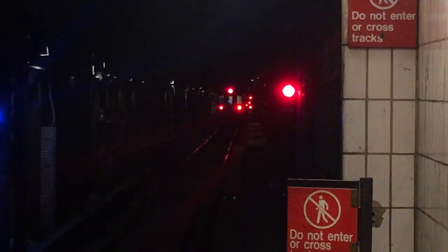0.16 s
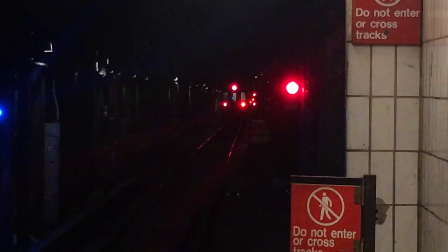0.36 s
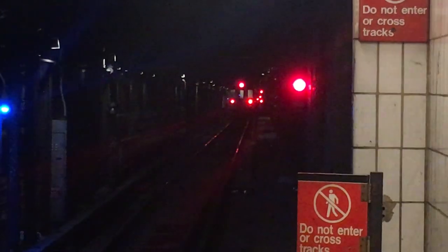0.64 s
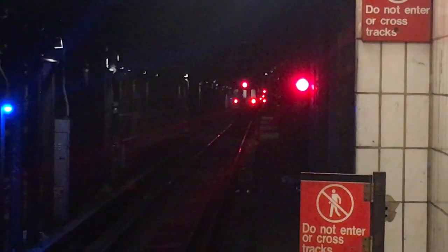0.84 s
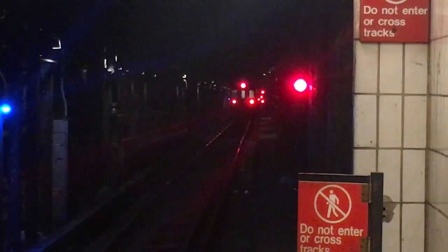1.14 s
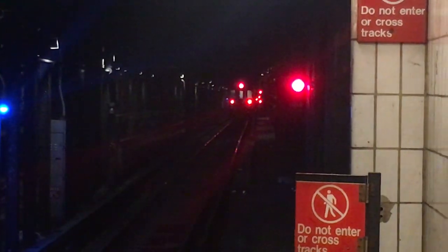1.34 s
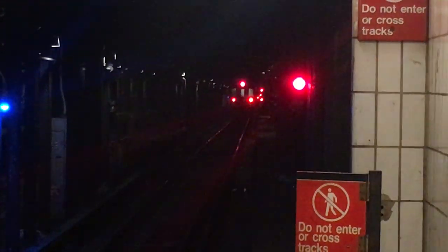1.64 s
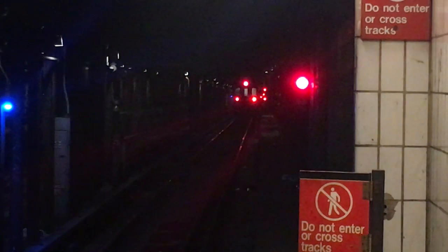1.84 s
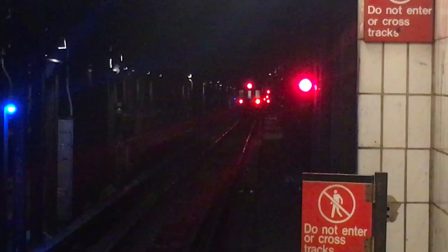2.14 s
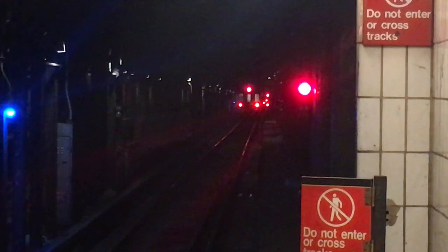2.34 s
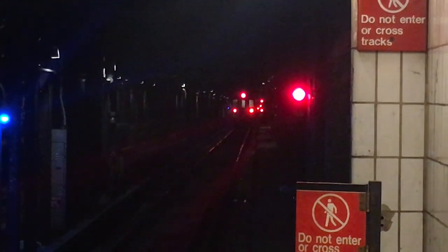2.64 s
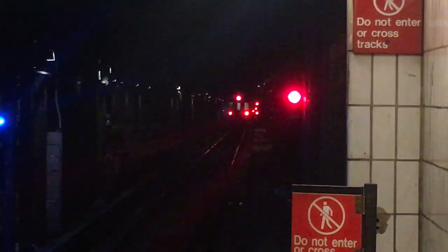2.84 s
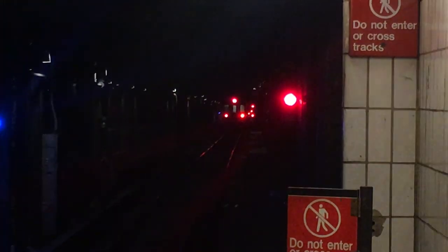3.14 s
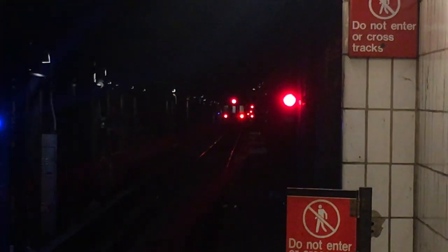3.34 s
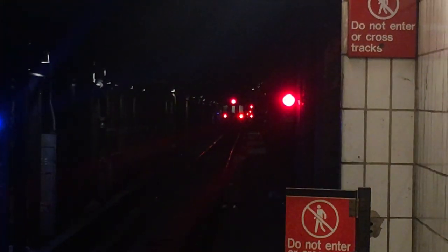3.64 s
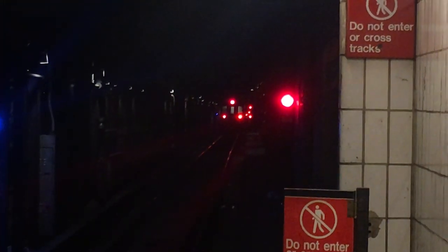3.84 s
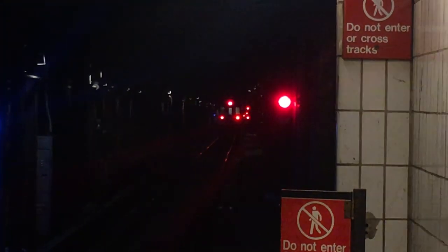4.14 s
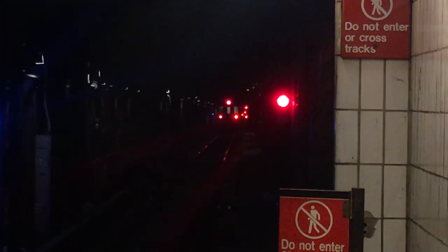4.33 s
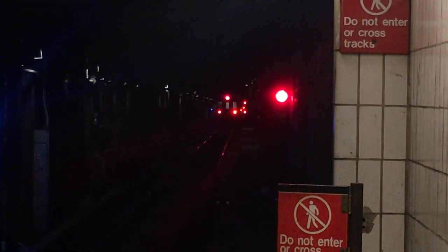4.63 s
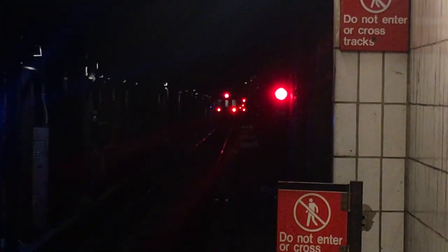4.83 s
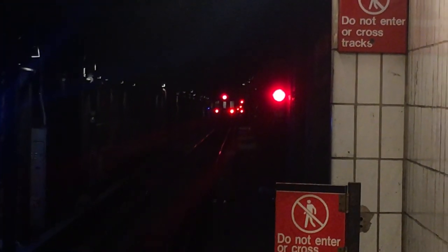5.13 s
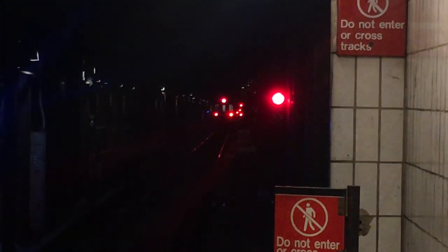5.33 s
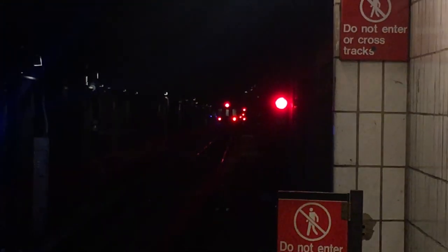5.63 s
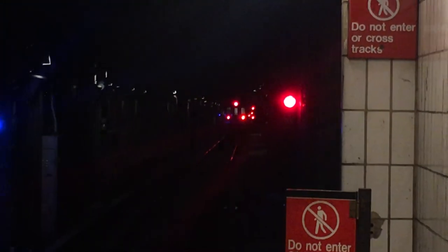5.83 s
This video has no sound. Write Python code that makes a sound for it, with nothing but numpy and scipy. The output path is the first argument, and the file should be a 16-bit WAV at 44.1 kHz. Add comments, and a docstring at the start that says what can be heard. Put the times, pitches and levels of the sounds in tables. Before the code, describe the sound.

For about six seconds, a train rolls away down an underground tunnel, heard from the platform end. A deep, booming rumble dominates throughout, mostly between about 50 and 210 hertz, with irregular short swells and lulls. From roughly 0.6 to 1.45 seconds the boom throbs evenly, about seven beats per second. Far quieter are a dull mid-range wheel roar and a thin rail whirr, which gradually loses brightness. Faint, fuzzy metallic squeaks dot the sound: a lower one near 0.55 seconds, many high chirps until 2.4, and the sharpest, a brief click-like squeak, at about 2.05. They become sparse from 2.6 to 4.9, then a soft high cluster comes around 5.0 to 5.4. Tunnel echo blurs them, and wheel rims murmur faintly. The deep rumble remains, slightly stronger in its lowest part at the end, without fully fading. Single channel, distant microphone, very faint steady hiss.

```python
"""End of an underground platform: a train rolls away down the tunnel.
Noise rings a few low tunnel resonances (the boom); shaped noise makes wheel roar and rail whirr.
Wheel rims squeak now and then, a fuzzy tone in rough noise bands with a tunnel echo.
Rim modes murmur as narrow-band noise; a faint hiss lies under it all."""
import sys
import numpy as np
from scipy import signal
from scipy.io import wavfile
from scipy.ndimage import uniform_filter1d

SR = 44100
rng = np.random.default_rng(int(sys.argv[2]) if len(sys.argv) > 2 else 0)


def generate_wav(sig):
    """Save sig (samples, or channels by samples) to the path in sys.argv[1] as 16-bit PCM at SR."""
    pcm = np.round(np.clip(np.atleast_2d(sig).T, -1, 1) * 32767).astype(np.int16)
    wavfile.write(sys.argv[1], SR, pcm)


N = 263704


def gain_of(db):
    """Amplitude factor of a level in dB."""
    return 10 ** (np.asarray(db) / 20)


def evened(x):
    """Scales to RMS 1."""
    return x / np.sqrt(np.mean(x ** 2) + 1e-20)


def smoothed_twice(x, size):
    """Two running means along the last axis."""
    return uniform_filter1d(uniform_filter1d(x, size=size), size=size)


def add(mix, start_s, sound):
    """Adds a sound in place, cut at the end of the mix."""
    part = mix[round(start_s * SR):][:len(sound)]
    part += sound[:len(part)]


def resonate(x, f_hz, pole_width_hz):
    """Shifts f_hz to zero, smooths with two equal poles, shifts back: steep resonance of peak gain 1."""
    turn = np.exp(2j * np.pi * np.cumsum(f_hz * np.ones(len(x))) / SR)
    r = np.exp(-np.pi * pole_width_hz / SR)
    once = signal.lfilter([1 - r], [1, -r], x / turn)
    twice = signal.lfilter([1 - r], [1, -r], once)
    return 2 * (turn * twice).real


def level(column, swell_db=0.):
    """Gain over time from one column of the slow levels, plus any swells."""
    # slow levels: t/s, deep rumble/dB, boom/dB, upper rumble/dB, wheel roar/dB, rail whirr/dB
    train_levels = [(0., -35., -29.5, -36, -51., -55), (1.4, -36., -28, -34.5, -52, -56.5),
                    (2.2, -37., -30., -35., -51.5, -55.5), (3.5, -34.5, -29, -36.5, -52.5, -58.),
                    (4.4, -34.5, -30.5, -36., -51.5, -58.5), (5.1, -33.5, -30.5, -37., -52, -57),
                    (5.98, -32, -31.5, -35, -52.8, -59.)]
    columns = np.transpose(train_levels)
    slow_db = np.interp(np.arange(N) / SR, columns[0], columns[column])
    return gain_of(slow_db + swell_db)


def wash(spectrum, patchy_db, flicker_db):
    """Random short-time spectra with drifting patches and a flicker shared by all pitches."""
    frame, hop = 512, 128  # samples
    frames, bins_hz = N // hop + 5, np.fft.rfftfreq(frame, 1 / SR)
    real, imag, patches = rng.standard_normal((frames, len(bins_hz), 3)).T
    patches = uniform_filter1d(patches, size=5, axis=0)  # over pitch
    patches = evened(uniform_filter1d(patches, size=30, axis=1))  # over time
    flicker = evened(uniform_filter1d(rng.standard_normal(frames), size=12))
    f_hz, db = np.transpose(spectrum)
    colour_db = np.interp(np.log(bins_hz + 1), np.log(f_hz), db, left=-90, right=-90)
    total_db = colour_db[:, None] + patchy_db * patches + flicker_db * flicker
    z = (real + 1j * imag) * gain_of(total_db)
    return evened(signal.istft(z, nperseg=frame, noverlap=frame - hop)[1][:N])


def rumble(modes):
    """Rolling noise rings low resonances of the tunnel."""
    drive = rng.standard_normal((len(modes), N + SR))
    rung = sum(gain_of(db) * resonate(d, f_hz, pole_width_hz)
               for d, (f_hz, pole_width_hz, db) in zip(drive, modes))
    swings = smoothed_twice(rung ** 2, size=3500)
    rung = rung / swings ** .3  # partly evens out the slow swings of chance
    return evened(rung[SR:])  # resonances build up in the dropped first second


def swells(column):
    """Bell-shaped rises and lulls in dB from one column of the swell table."""
    # swells and lulls: t/s, deep rumble rise/dB, boom rise/dB, upper rumble rise/dB
    rumble_swells = [(.02, 9.5, 5.5, -3), (.17, 0.5, 5., -1.5), (.27, 8, 3, 3.5), (.4, 4.5, 3, 2),
                     (1.04, 8, -2, -2), (1.62, 6, 2.5, -2), (1.93, 12, 0, -1.5), (2.04, 0., -0.5, 4),
                     (2.15, 3, -4., 4.5), (2.36, -5, 4., 1.5), (2.71, 0., 0, 2), (2.89, 4, -6.5, 4.),
                     (3.21, 4, 5, 3), (3.4, 8., -4, 0.5), (4.05, 6.5, -1, 2.5), (4.23, 2, 4.5, -1.5),
                     (4.38, 0.5, 9, 1), (4.82, 6., 0., 0.), (3.71, -1.5, 5.5, 1), (5.02, 5.5, -1.5, -0.5),
                     (5.25, 5., 2.5, -1), (5.62, -1.5, -3, 0.5), (5.83, -1.5, -4.5, -5.5)]
    sigma_s = 0.021
    t = np.arange(N) / SR
    return sum(row[column] * np.exp(-.5 * ((t - row[0]) / sigma_s) ** 2) for row in rumble_swells)


def throb():
    """An even beat in dB that fades in and out over half a beat."""
    # early throb of the boom: first beat/s, last beat/s, rate/Hz, depth either way/dB
    even_beat = (0.611, 1.45, 7.16, 3.8)
    first_s, last_s, rate_hz, depth_db = even_beat
    t = np.arange(N) / SR
    gate = np.clip(np.minimum(t - first_s, last_s - t) * 2 * rate_hz + 1, 0, 1)
    return depth_db * gate * np.cos(2 * np.pi * rate_hz * (t - first_s))


def tunnel_rumble():
    """Three groups of tunnel resonances, each with its own slow level and swells."""
    # tunnel resonances: f/Hz, width of each pole/Hz, level within the group/dB
    deep_modes = [(51.9, 16, -6.5), (67.5, 24.8, -2.5)]
    boom_modes = [(121.05, 34, -0.5), (133.45, 22.6, 1), (156.3, 32, -5.5)]
    upper_modes = [(192.15, 13.4, 5.5), (211.5, 79.7, -1), (318.2, 91, -13.5)]
    deep = level(column=1, swell_db=swells(column=1)) * rumble(deep_modes)
    boom = level(column=2, swell_db=swells(column=2) + throb()) * rumble(boom_modes)
    upper = level(column=3, swell_db=swells(column=3)) * rumble(upper_modes)
    return deep + boom + upper


def wheel_roar():
    """Dull roar of the wheels: mid-band noise, slightly patchy and flickering."""
    # relative noise density: f/Hz, level/dB per Hz
    roar_spectrum = [(250, -7), (420, 6.5), (540, 1), (620, 10), (710, 5.5), (800, 6), (980, 2),
                     (1190, -9.5), (1500, -36)]
    return level(column=4) * wash(roar_spectrum, patchy_db=-0.23, flicker_db=0.72)


def rail_whirr():
    """Brighter rail noise above the roar."""
    # relative noise density: f/Hz, level/dB per Hz
    whirr_spectrum = [(900, -2), (1300, -0.5), (1650, -1), (1950, 0), (2400, -9), (2900, -7.5),
                      (3400, -11.5), (3800, -12.5), (4050, -20.5), (4350, -17.5), (4700, -22),
                      (5200, -21.5), (6500, -38.5), (8000, -55)]
    return level(column=5) * wash(whirr_spectrum, patchy_db=0.4, flicker_db=0.64)


def squeak(nominal_s, f_hz, db):
    """Stick-slip rings one rim mode: a wandering thread of tone in a rough band and a wide scrape."""
    u = np.linspace(0, 1, int(1.2 * nominal_s * SR))
    wander, grit, rasp, slips = rng.standard_normal((4, len(u)))
    waver_hz = 50. + 450. * nominal_s  # longer squeaks waver more widely
    pitch_hz = f_hz + 40. * rng.standard_normal() * (u - .5)  # chance glide up or down
    thread_hz = pitch_hz + .3 * waver_hz * evened(uniform_filter1d(wander, size=500))
    thread = np.sin(2 * np.pi * np.cumsum(thread_hz) / SR)
    band = evened(resonate(grit, pitch_hz, 30 + 1.15 * waver_hz))
    scrape = evened(resonate(rasp, pitch_hz, 900.))
    ring = 1.1 * thread + band + .25 * scrape
    ring = ring * gain_of(1.2 * evened(uniform_filter1d(slips, size=400)))  # grip comes in jerks
    envelope = u ** 0.38 * (1 - u) ** 0.46
    return gain_of(db) * evened(ring * envelope)


def echo(x, t60_s):
    """A dense noise tail off the tunnel walls, energy 1, cut at half a second."""
    t = np.arange(SR // 2) / SR
    tail = rng.standard_normal(len(t)) * gain_of(-60 * t / t60_s)
    return signal.fftconvolve(x, tail / np.linalg.norm(tail))[:N]


def rim_squeaks():
    """Wheel rims sing in short squeaks, with the tunnel echo added."""
    # squeaks: t/s, nominal length/s (sounds 1.2 times as long), f/Hz, RMS level before echo/dB
    squeak_events = [(0.322, 0.042, 4020, -75.5), (0.466, 0.022, 4900, -73), (0.53, 0.16, 1660, -61.5),
                     (0.572, 0.07, 4830, -70.5), (0.547, 0.09, 5050, -76), (0.645, 0.084, 4000, -75.5),
                     (0.78, 0.288, 4820, -77), (0.843, 0.036, 5110, -76), (0.885, 0.084, 2300, -69),
                     (0.995, 0.03, 4040, -69.5), (1.058, 0.051, 4100, -68), (1.059, 0.11, 4750, -79),
                     (1.228, 0.06, 5500, -79), (1.242, 0.05, 3700, -66), (1.312, 0.3, 5330, -78),
                     (1.4, 0.07, 5500, -79.5), (1.329, 0.14, 3464, -64.5), (1.52, 0.09, 4100, -73),
                     (1.724, 0.057, 5340, -75), (1.849, 0.2, 4600, -78.5), (1.749, 0.13, 4110, -76.5),
                     (2.052, 0.035, 1957, -55.5), (2.055, 0.069, 2340, -68.5), (2.097, 0.15, 5070, -78),
                     (2.14, 0.11, 4650, -74.5), (2.144, 0.12, 4020, -66), (2.101, 0.29, 3100, -68),
                     (2.347, 0.07, 4810, -74.5), (2.59, 0.03, 4130, -75), (3.05, 0.24, 3480, -71),
                     (3.404, 0.037, 3450, -69.5), (3.66, 0.12, 3400, -69.5), (3.87, 0.19, 4830, -80.5),
                     (3.88, 0.19, 3430, -75.5), (4.344, 0.026, 4600, -70), (4.348, 0.03, 3280, -69.5),
                     (4.7, 0.062, 4630, -73.5), (4.843, 0.035, 4700, -75), (4.98, 0.082, 4120, -80),
                     (5.05, 0.073, 4810, -71), (5.061, 0.075, 3250, -73), (5.128, 0.17, 4680, -74.5),
                     (5.167, 0.15, 4120, -65.5), (5.193, 0.11, 3950, -69.5), (5.23, 0.15, 4160, -69.5)]
    rims = np.zeros(N)
    for start_s, *settings in squeak_events:
        add(rims, start_s, squeak(*settings))
    return rims + gain_of(-8.5) * echo(rims, t60_s=0.93)


def rim_murmur():
    """Rail roughness keeps a few rim modes ringing, each coming and going."""
    # rim modes: f/Hz, width of each pole/Hz, level relative to the rail whirr/dB
    rim_modes = [(701, 62, -6.5), (3290, 73, -19), (3450, 190, -23), (4053, 100, -22.5), (4610, 66, -27.5),
                 (4810, 57, -29.5)]
    drive, slow = rng.standard_normal((2, len(rim_modes), N))
    slow = smoothed_twice(slow, size=3000)
    modes = sum(gain_of(db + 2.5 * evened(e)) * evened(resonate(d, f_hz, pole_width_hz))
                for d, e, (f_hz, pole_width_hz, db) in zip(drive, slow, rim_modes))
    return level(column=5) * modes


def faint_hiss():
    """Steady, slightly patchy treble noise."""
    # relative noise density: f/Hz, level/dB per Hz
    hiss_spectrum = [(3000, -9), (6000, 1.5), (7500, -5.5), (8000, -6), (9600, -8.5), (10400, -14.5),
                     (11200, -11.5), (16500, -20)]
    return gain_of(-78) * wash(hiss_spectrum, patchy_db=.5, flicker_db=0)


def scene():
    """Sums all layers into one channel."""
    train = tunnel_rumble() + wheel_roar() + rail_whirr()
    rims = rim_squeaks() + rim_murmur()
    return (train + rims + faint_hiss())[None]


def record(dry):
    """The microphone rolls off the lowest bass; a linear-phase low-pass limits the band."""
    edge_hz = 15720
    thin = signal.sosfilt(signal.butter(4, 36., "high", fs=SR, output="sos"), dry)
    low_pass = signal.firwin(511, edge_hz, window=("kaiser", 9), fs=SR)
    return signal.oaconvolve(thin, low_pass[None], "same")


dry = scene()
out = record(dry)
generate_wav(out)
```